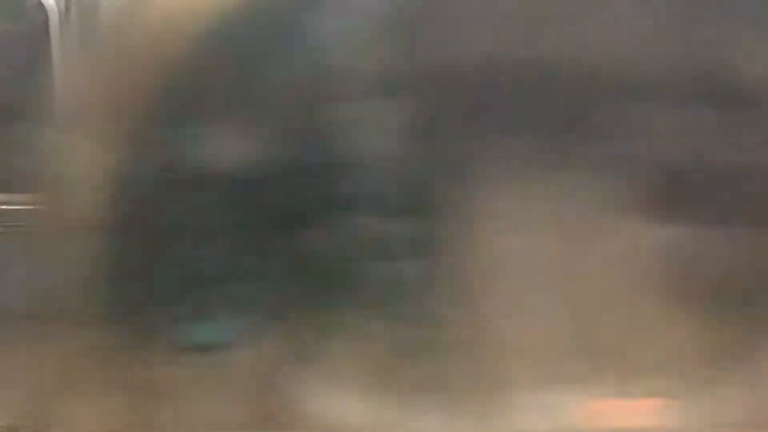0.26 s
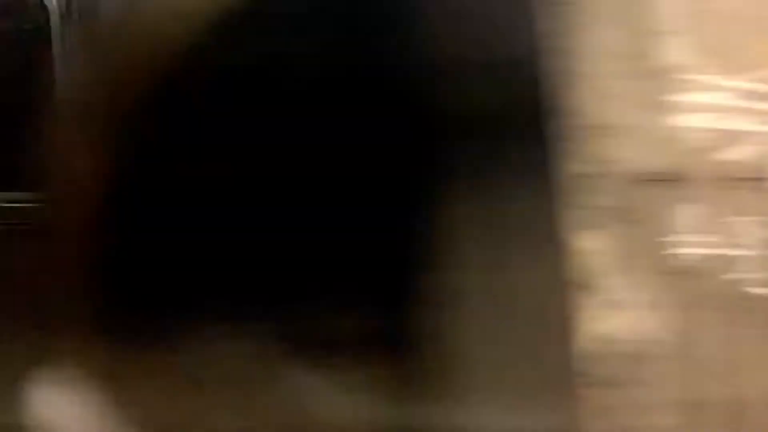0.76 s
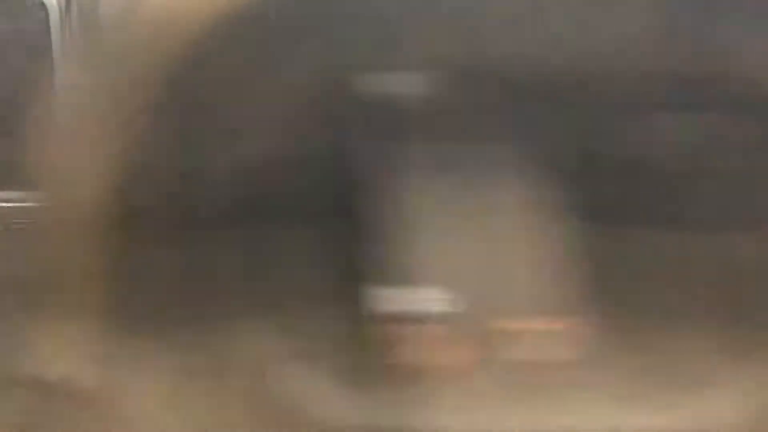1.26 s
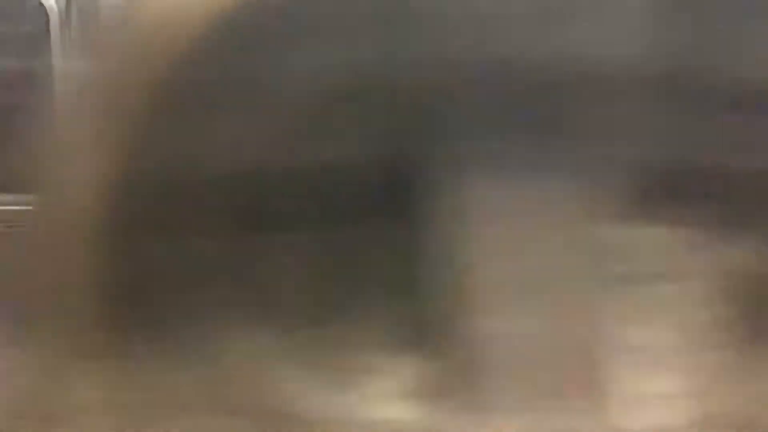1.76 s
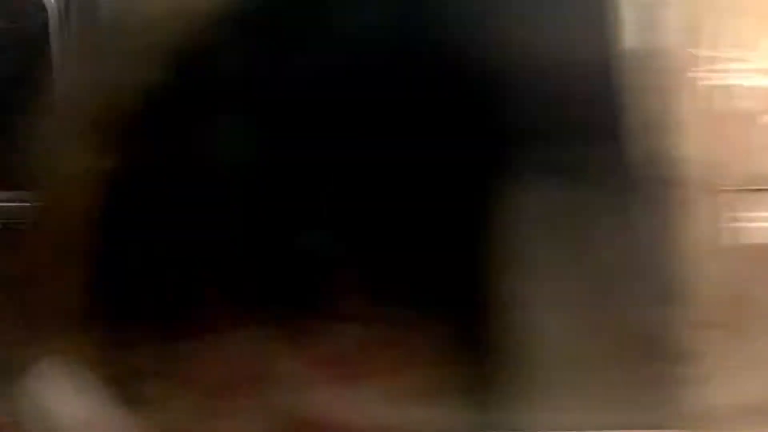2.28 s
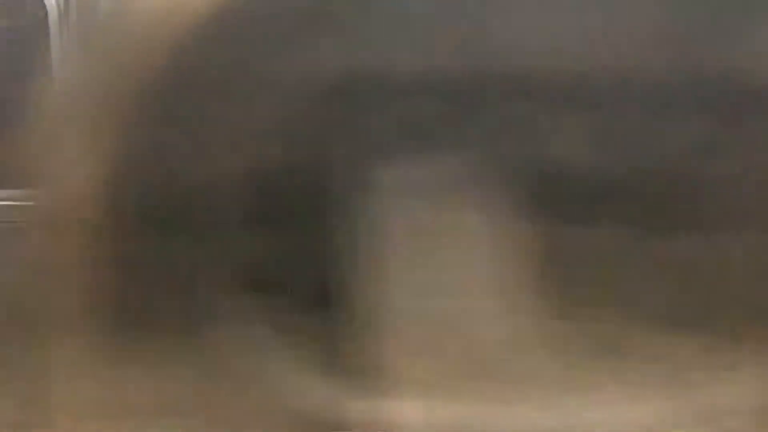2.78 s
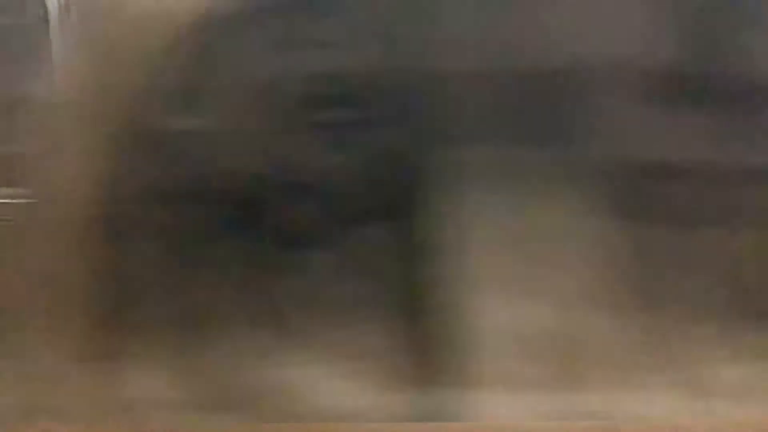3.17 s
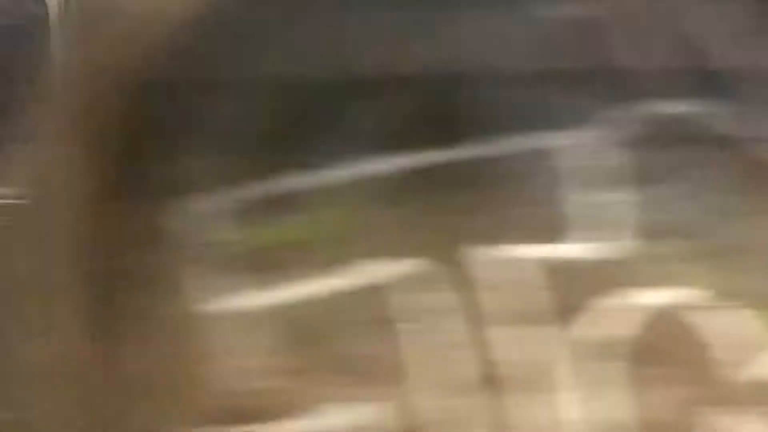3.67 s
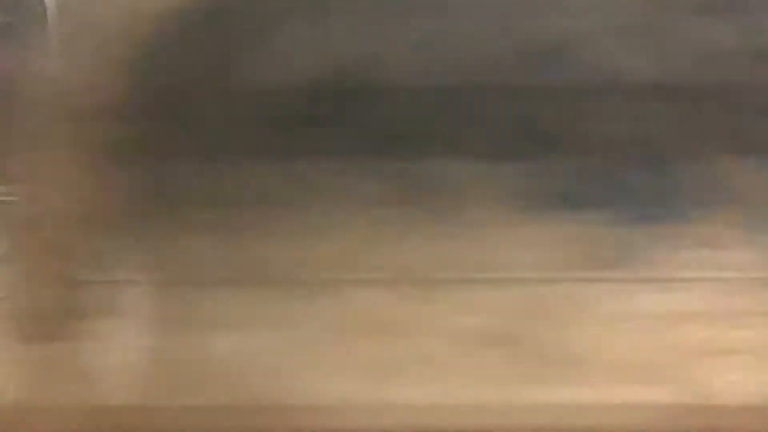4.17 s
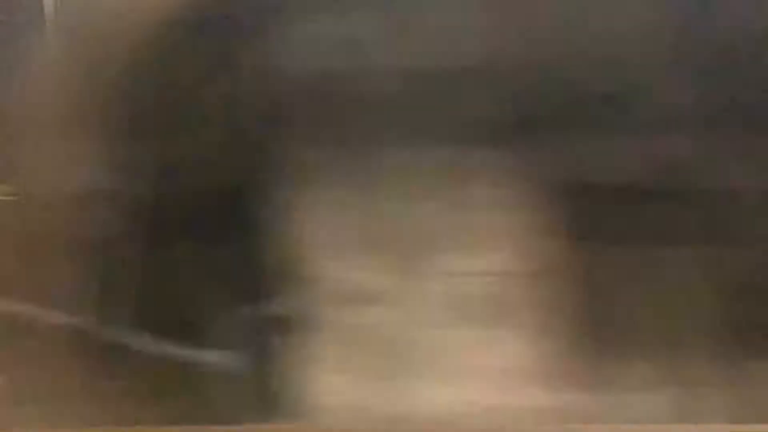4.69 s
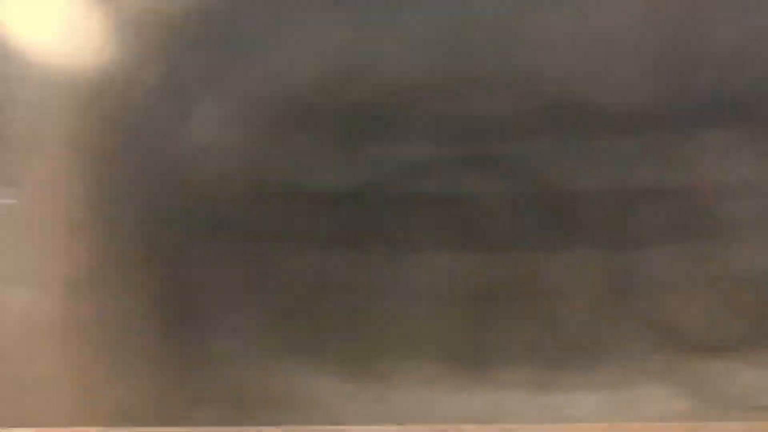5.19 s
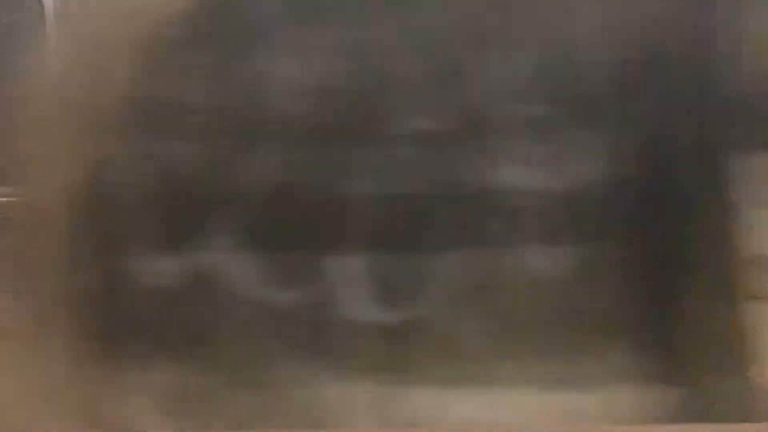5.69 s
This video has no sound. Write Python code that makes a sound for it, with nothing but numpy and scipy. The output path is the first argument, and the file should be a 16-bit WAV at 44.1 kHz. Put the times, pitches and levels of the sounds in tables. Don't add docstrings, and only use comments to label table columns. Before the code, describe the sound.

Inside a subway car running fast through a tunnel, steel wheels roar continuously on rough rails. The floor booms and a wall panel knocks in irregular quick thuds, densest at the start. Short high hisses of a metal shoe scraping the power rail come and go, with one tiny dry snap early and a crackling spark later. Two small microphones in the car give a wide, slightly overloaded sound.

```python
import sys
import numpy as np
from scipy import signal
from scipy.io import wavfile
from scipy.ndimage import uniform_filter1d

SR = 44100
rng = np.random.default_rng(int(sys.argv[2]) if len(sys.argv) > 2 else 0)


def transcribe(signal):
    frames = np.atleast_2d(signal).T
    limited = np.clip(frames, -1, 1)
    pcm = np.round(limited * 32767).astype(np.int16)
    wavfile.write(sys.argv[1], SR, pcm)


def amp(db):
    return 10 ** (np.asarray(db, float) / 20)


N = 262262

HOP = 256
FRAME_S = np.arange(N // HOP + 5) * HOP / SR
BIN_HZ = np.fft.rfftfreq(4 * HOP, 1 / SR)[:, None]


def evened(x):
    return x / np.sqrt(np.mean(abs(x) ** 2) + 1e-20)


def read(points, hz):
    f, value = np.transpose(points)
    return np.interp(np.log(hz + 1), np.log(f + 1), value)


def band_db(shape_db, lo_hz, hi_hz):
    inside = (BIN_HZ > lo_hz) & (BIN_HZ < hi_hz)
    return shape_db - 10 * np.log10(np.sum(amp(2 * shape_db[inside])) / len(BIN_HZ))


def swells(middle_s, length_s, rise=0.48):
    late = FRAME_S[:, None] - middle_s
    half_s = length_s * np.where(late < 0, rise, 1 - rise)
    return .5 ** (late / half_s) ** 2


# (f/Hz, likeness 0-1)
LIKENESS = [(30, .92), (90, .87), (180, .9), (260, .82), (420, .44), (540, .32), (700, .54), (1000, .28),
            (1550, .42), (2100, .2), (2700, .26), (3500, .12), (4000, .22), (5600, .1), (6900, .52),
            (8000, .72), (16000, .74)]
# (f/Hz, level/dB)
LEFT_LOUDER = [(60, -3.5), (110, 5.5), (200, -2.5), (380, 2.5), (500, 3.4), (700, 3), (950, 3),
               (1400, -0.4), (2380, 0.2), (4000, -0.1), (5400, -3), (8120, -.5), (15000, 2)]
# (f/Hz, phase/rad)
LEFT_LEADS = [(0, 0), (260, .2), (400, .7), (560, 1.7), (1150, 1.8), (1570, 3.4), (2200, 4.9), (2670, 3.8),
              (3060, 3.1), (4000, 6.3), (4500, 6.6), (5150, 9.4), (6300, 12.5), (8700, 9.4), (11100, 6.3),
              (13200, 3.1), (14900, .2), (15800, -1.6)]


def pair(field_db, patchy_db, ringy_db, flicker_db):
    a, b, c, d, patches, rings = rng.standard_normal((len(FRAME_S), len(BIN_HZ), 6)).T
    patches = evened(uniform_filter1d(uniform_filter1d(patches, size=10, axis=0), size=10, axis=1))
    rings = evened(uniform_filter1d(uniform_filter1d(rings, size=2, axis=0), size=24, axis=1))
    flicker = evened(uniform_filter1d(rng.standard_normal(len(FRAME_S)), size=3))
    same = read(LIKENESS, BIN_HZ)
    left = a + 1j * b
    delayed = left * np.exp(-1j * np.interp(BIN_HZ, *np.transpose(LEFT_LEADS)))
    right = same * delayed + np.sqrt(1 - same ** 2) * (c + 1j * d)
    lean = amp(read(LEFT_LOUDER, BIN_HZ) / 2)
    above_bass = 1 / (1 + (400 / (BIN_HZ + 1)) ** 2)
    field_db = field_db + above_bass * (patchy_db * patches + ringy_db * rings) + flicker_db * flicker
    z = np.array([left * lean, right / lean]) * amp(field_db)
    return signal.istft(z, nperseg=4 * HOP, noverlap=3 * HOP)[1][:, :N] / np.sqrt(3 * HOP)


# (f/Hz, level/dB per Hz)
ROAR_SPECTRUM = [(30, -40), (45, -12), (93, -8.5), (130, -12), (167, -9.5), (254, -9), (456, -11),
                 (640, -17.5), (1000, -20), (1600, -24), (2500, -26.5), (3100, -30), (4400, -38.5),
                 (5300, -49.5), (7400, -59)]
# (f/Hz, width/Hz, level over the roar/dB)
WHEEL_RINGS = [(242.6, 23, 4.5), (439, 29, 0.5), (747.4, 35, 8), (1116, 34, 3), (1400, 110, 2.5),
               (1878, 127, 3.5), (2366, 195, 2.5), (3286, 430, -7), (3800, 830, 0.5), (5850, 280, 4.5),
               (6800, 1200, 7.5)]


def wheel_spectrum():
    rings_db = sum(db / (1 + (2 * (BIN_HZ - hz) / width) ** 2) for hz, width, db in WHEEL_RINGS)
    blocked_db = 40 * np.log2(np.maximum(BIN_HZ / 8600, 1))
    return band_db(read(ROAR_SPECTRUM, BIN_HZ) + rings_db - blocked_db, 2103, 7000)


# (middle t/s, length/s, roar rise/dB, floor drum rise/dB, wall drum rise/dB)
ROUGH_STRETCHES = [(0.106, 0.11, 2, 2.5, 0.5), (.23, 0.13, 5.5, -0.1, 3.5), (0.413, 0.13, 2.5, -1.5, 5),
                   (0.576, 0.22, -1.2, 1, 3.5), (0.971, 0.11, -1, 2.5, 3.5), (1.081, 0.094, 0, 2, 0),
                   (1.185, 0.15, 4, 0.5, 2), (1.51, 0.25, 2.5, 3, 4.5), (2.032, .12, -0.5, .5, 0.5),
                   (2.151, 0.11, -0.5, -3.5, 3), (2.539, 0.16, 1.5, 2.5, 4), (2.704, 0.16, 1, 3.5, 3),
                   (2.909, 0.12, 3, 3.5, 4), (3.095, 0.19, 2.5, 3, 4.5), (3.431, 0.24, 1.5, 1, 1),
                   (3.783, 0.4, 2, 0, 0.9), (3.97, 0.13, 0.5, 2, -0.5), (4.098, 0.11, 4.5, 4.5, 5),
                   (4.25, 0.11, 1, 2.5, 1), (4.531, 0.086, 0.3, -1, 3), (4.787, 0.3, -0.1, 1, 1.8),
                   (5.121, 0.15, 1, 1, 1.7), (5.309, 0.12, 2, 2.5, 0), (5.556, 0.059, 1.5, 4, 2),
                   (5.805, 0.23, 1.5, 2.5, 2.7)]


def rough_rail():
    s, length, *rise_db = np.transpose(ROUGH_STRETCHES)
    roar_db, floor_db, wall_db = rise_db @ swells(s, length).T
    floor_db = floor_db + 0.73 - 0.65 * FRAME_S
    wall_db = wall_db - 0.06 - 1.03 * FRAME_S
    roar_db = roar_db - 1.0 * FRAME_S
    low = 1 / (1 + (BIN_HZ / 520) ** 4)
    high = 1 / (1 + (1600 / (BIN_HZ + 1)) ** 4)
    return low * floor_db + (1 - low - high) * wall_db + high * roar_db


# (middle t/s, length/s, f/Hz, level over the roar/dB)
RING_FLARES = [(0.085, 0.17, 284, 7), (0.267, 0.11, 3480, -0.5), (0.325, 0.11, 4890, 3),
               (0.536, 0.091, 920, 3.0), (0.945, 0.073, 265, 4.5), (1.181, 0.12, 540, 5.5),
               (1.193, 0.17, 2390, 3.5), (1.26, 0.11, 3080, 2.5), (1.32, 0.082, 2390, 4),
               (1.429, 0.1, 1330, 3.5), (1.503, 0.11, 2670, 2.5), (1.544, 0.048, 973, 1),
               (1.698, 0.069, 590, 4.5), (2.101, 0.098, 3150, 2), (2.154, 0.1, 7660, 4),
               (2.499, 0.108, 1650, 2.5), (2.563, 0.12, 1297, 1.5), (2.638, 0.13, 3330, 2.0),
               (2.854, 0.061, 1912, -3), (2.953, 0.083, 456, 4), (3.078, 0.14, 181, 6.5),
               (3.146, 0.085, 3340, 0), (3.454, 0.093, 290, 1), (3.553, 0.089, 3140, 2.5),
               (3.593, 0.085, 1460, -1), (3.64, 0.11, 468, 2.5), (3.717, 0.15, 524, 2),
               (4.093, 0.053, 1700, 2), (4.106, 0.2, 4580, 2), (4.113, 0.161, 321, 6.5),
               (4.186, 0.23, 915, 2.5), (4.22, 0.072, 2500, 1.5), (4.343, 0.094, 605, 3.0),
               (4.406, 0.083, 3480, 2.5), (4.464, 0.084, 5470, 7), (4.529, 0.057, 414, 8),
               (4.735, 0.084, 940, 1), (4.76, 0.101, 6440, 6), (4.886, 0.07, 1713, 6),
               (5.12, 0.22, 3950, 2.5), (5.133, 0.12, 830, 2.5), (5.191, 0.109, 5150, 2.0),
               (5.318, 0.079, 1800, 4.5), (5.574, 0.121, 6040, 1.5), (5.608, 0.093, 2975, 1),
               (5.857, 0.052, 345.5, 5.5), (5.884, 0.07, 1063, 1), (5.95, 0.074, 4195, 4)]


def ring_flares():
    width_octaves, gain = 0.26, 1.24
    s, length, hz, db = np.transpose(RING_FLARES)
    near = .5 ** (2 * np.log2((BIN_HZ + 1) / hz) / width_octaves) ** 2
    return gain * near @ (swells(s, length) * db).T


def rolling():
    level_db = -35 + 6
    field_db = wheel_spectrum() + level_db + rough_rail() + ring_flares()
    return pair(field_db, patchy_db=0.35, ringy_db=2.5, flicker_db=0.49)


def mode(hz, width, steadiness):
    r = np.exp(-np.pi * width / SR)
    swing = rng.standard_normal((N, 2)) @ [1, 1j]
    for _ in range(2):
        swing = signal.lfilter([1 - r], [1, -r], swing)
    swing = swing / (abs(swing) + 1e-9) ** steadiness
    phase = 2 * np.pi * np.cumsum(hz) / SR
    return evened((swing * np.exp(1j * phase)).real)


def shaken(rows, rest_db, rest_hz):
    s, length, db, hz = np.transpose(rows)
    power = swells(s, 1.14 * length) * amp(2 * db)
    rest = amp(2 * rest_db)
    total = power.sum(axis=1) + rest
    pitch = (power @ hz + rest * rest_hz) / total
    t = np.arange(N) / SR
    return np.interp(t, FRAME_S, np.sqrt(total)), np.interp(t, FRAME_S, pitch)


# (middle t/s, length/s, level/dB, f/Hz)
PANEL_KNOCKS = [(0.009, 0.035, -16, 135), (0.045, 0.036, -14.5, 131.3), (0.122, 0.036, -15.5, 134.6),
                (0.186, 0.035, -16, 143.4), (0.252, 0.038, -19, 138), (0.361, 0.035, -23.5, 140.7),
                (0.392, 0.034, -20.0, 146.9), (0.474, 0.035, -21.0, 138.8), (0.506, 0.035, -21.0, 150),
                (0.558, 0.036, -19.0, 140.0), (0.587, 0.037, -21, 147), (0.658, 0.039, -17.0, 132.7),
                (0.726, 0.036, -21.5, 141.3), (0.88, 0.038, -22.5, 139), (0.975, 0.043, -19, 138.2),
                (1.063, 0.037, -19.5, 141.4), (1.181, 0.04, -19.5, 138.8), (1.24, 0.035, -20.5, 138.8),
                (1.315, 0.035, -24, 140.4), (1.345, 0.033, -22.5, 149.8), (1.385, 0.035, -23, 140.6),
                (1.415, 0.036, -20.5, 132.7), (1.599, 0.039, -23.5, 136.5), (1.649, 0.034, -19.5, 141),
                (1.746, 0.035, -19, 144.4), (1.785, 0.038, -23.5, 138), (1.816, 0.038, -23.5, 138.7),
                (1.878, 0.037, -22.5, 151), (2.107, 0.036, -18.5, 142.1), (2.281, 0.037, -21.5, 148.6),
                (2.476, 0.035, -20.5, 139.8), (2.549, 0.034, -23, 144.4), (2.603, 0.033, -20.5, 136),
                (2.687, 0.036, -21, 143), (2.873, 0.036, -18.5, 143.1), (3.057, 0.033, -19, 142.6),
                (3.093, 0.04, -14.5, 141.2), (3.331, 0.031, -23.5, 137.0), (4.143, 0.036, -18, 135.8),
                (4.2, 0.037, -21, 133.1), (4.247, 0.035, -19.5, 143.7), (4.381, 0.037, -21.5, 148.3),
                (4.546, 0.039, -19, 131.9), (4.603, 0.038, -22.5, 132.8), (4.649, 0.039, -21.5, 143.6),
                (4.88, 0.035, -25, 139), (4.934, 0.034, -21.5, 133), (5.041, 0.035, -23, 138.3),
                (5.404, 0.035, -23, 141), (5.44, 0.035, -23.0, 133.8)]


def wall_panel():
    gain, hz = shaken(PANEL_KNOCKS, rest_db=-31.5, rest_hz=138.8)
    return 0.7 * gain * mode(hz, width=26., steadiness=.85)


# (middle t/s, length/s, level/dB, f/Hz)
FLOOR_BOOMS = [(0.018, 0.021, -11, 89.7), (0.086, 0.027, -17, 89.6), (0.195, 0.072, -11.5, 94.03),
               (0.317, 0.082, -13.5, 93.73), (0.429, 0.028, -14, 88.47), (0.54, 0.044, -19.5, 94),
               (0.678, 0.035, -21.5, 90.75), (0.757, 0.054, -19.0, 86.55), (0.893, 0.034, -21.5, 84.64),
               (0.952, 0.026, -26.5, 86.86), (1.104, 0.033, -17, 90.24), (1.184, 0.038, -11, 83),
               (1.338, 0.066, -15.5, 91.5), (1.41, 0.028, -18.5, 91.9), (1.469, 0.027, -17.5, 87.3),
               (1.506, 0.032, -15, 94.7), (1.599, 0.082, -17, 90.96), (1.741, 0.028, -15, 83.26),
               (1.812, 0.031, -23.5, 86.6), (1.85, 0.031, -20, 90.6), (1.891, 0.024, -20, 85.4),
               (2.154, 0.047, -20, 94.1), (2.238, 0.022, -17.5, 90.2), (2.324, 0.031, -20.0, 87.4),
               (2.381, 0.037, -19.5, 95.1), (2.562, 0.036, -20, 96), (2.599, 0.028, -27.5, 89.6),
               (2.655, 0.024, -32, 91.6), (2.769, 0.04, -23.5, 96.94), (2.878, 0.031, -20.5, 96.4),
               (2.914, 0.059, -21.0, 83.14), (3.054, 0.032, -11.5, 89.7), (3.136, 0.041, -13.0, 86.74),
               (3.247, 0.039, -20.5, 89), (3.333, 0.024, -17, 94.8), (3.426, 0.031, -22, 93.2),
               (3.531, 0.039, -25.5, 94.7), (3.678, 0.034, -24, 93.7), (3.891, 0.035, -21.5, 94.6),
               (3.955, 0.024, -17.5, 90.5), (4.109, 0.036, -14.5, 93.3), (4.168, 0.059, -16, 90),
               (4.315, 0.05, -17.5, 92.7), (4.449, 0.053, -22.5, 86.3), (4.599, 0.032, -22.5, 93.5),
               (4.68, 0.025, -20.0, 100.7), (5.095, 0.027, -22.5, 83.5), (5.333, 0.035, -18, 88.4),
               (5.592, 0.035, -21.0, 94.6), (5.857, 0.039, -21.5, 84.4)]


def floor_boom():
    gain, hz = shaken(FLOOR_BOOMS, rest_db=-32.5, rest_hz=89.8)
    return gain * mode(hz, width=14., steadiness=.9)


# (middle t/s, length/s, level/dB, f/Hz)
CAR_SWAYS = [(0.098, 0.047, -16.5, 45.9), (0.161, 0.04, -19.5, 52.9), (0.249, 0.043, -19.5, 53),
             (0.388, 0.03, -20, 47), (0.447, 0.049, -18, 44.5), (0.587, 0.031, -26.5, 55.6),
             (0.68, 0.059, -22, 55.6), (0.803, 0.032, -24.5, 55), (0.873, 0.027, -24, 58.7),
             (0.952, 0.032, -17, 51.2), (1.025, 0.032, -25, 54), (1.107, 0.031, -20, 53.8),
             (1.22, 0.12, -17.5, 53.7), (1.499, 0.058, -17.5, 54), (1.576, 0.046, -15, 51.8),
             (1.701, 0.04, -18, 60.5), (1.825, 0.086, -21, 52.6), (2.018, 0.062, -20, 54.2),
             (2.141, 0.035, -24, 52.5), (2.295, 0.031, -18.5, 54.8), (2.372, 0.042, -22.5, 58),
             (2.454, 0.038, -19.5, 58.2), (2.517, 0.046, -22, 55.1), (2.671, 0.051, -18, 51.4),
             (2.744, 0.043, -20.5, 57.6), (2.868, 0.035, -18.5, 53.2), (2.939, 0.037, -21, 55.3),
             (2.993, 0.062, -19.5, 53.1), (3.143, 0.041, -18, 50.7), (3.231, 0.045, -18, 51.9),
             (3.512, 0.065, -23, 51.6), (3.603, 0.047, -22.5, 59.4), (3.735, 0.074, -22.5, 49.6),
             (3.88, 0.033, -16, 54.2), (3.943, 0.037, -25, 54.1), (4.007, 0.075, -22.5, 59.5),
             (4.231, 0.09, -21.0, 60), (4.44, 0.099, -24, 51.6), (4.599, 0.039, -26.5, 51.7),
             (4.714, 0.034, -25.0, 52.2), (4.769, 0.041, -21.5, 51.2), (4.957, 0.15, -22.5, 52.6),
             (5.118, 0.053, -21.5, 62.8), (5.265, 0.039, -22.5, 62), (5.594, 0.033, -24, 55.6),
             (5.717, 0.035, -25.5, 51.7), (5.8, 0.049, -18.5, 54.6), (5.925, 0.035, -18, 52.0)]


def car_sway():
    gain, hz = shaken(CAR_SWAYS, rest_db=-32, rest_hz=54.6)
    return gain * mode(hz, width=14., steadiness=.9)


def body():
    late = 15
    both = np.pad(wall_panel() + floor_boom() + car_sway(), (late, 0), "edge")
    return np.array([both[late:], both[:N]]) * amp(np.array([[-.5], [.5]]))


# (f/Hz, level/dB per Hz)
HISS_SPECTRUM = [(5000, -25), (6300, -6), (7000, -3), (8400, -2), (9300, 0), (10300, -2), (11500, -5),
                 (12500, -9), (13500, -30)]
# (f/Hz, level/dB per Hz)
THIN_TOP_SPECTRUM = [(11000, -30), (12200, -1), (13800, -1), (14900, -9), (15400, -18), (16200, -30)]
# (peak t/s, length/s, hiss level/dB, ring over hiss/dB, thin top over hiss/dB)
SHOE_BITES = [(0.065, 0.13, -61, 5.5, -7), (0.196, 0.094, -55, 2, -7), (.41, 0.15, -57.5, -1, -5),
              (0.634, 0.095, -65, 4, -2), (0.773, 0.1, -63, 1.5, -6), (1.048, 0.12, -63, -2, -4),
              (1.164, 0.12, -59.5, 8, -2), (1.486, 0.14, -64, 2, -6), (1.623, .16, -66, -2.2, -6),
              (1.884, 0.076, -63.5, -1.5, -11), (2.116, 0.09, -54.5, 1, -15), (2.434, 0.06, -56, 5, -24),
              (2.849, 0.22, -61.5, 0, -9), (3.086, 0.18, -62.5, .3, -6), (3.48, 0.063, -67, 1.5, -9),
              (3.645, 0.098, -70, .3, -11), (4.069, 0.19, -59, 4, -12), (4.145, 0.2, -68, 24, -8),
              (4.308, 0.13, -62, 2.2, -8), (4.449, 0.095, -57.5, -3, -4), (4.751, 0.087, -60, 2, -12),
              (4.824, 0.063, -58.5, 1.5, -9.5), (5.063, 0.19, -74, 6, -9), (5.93, 0.055, -68, 1, -8)]


def shoe():
    slide_db, slide_ring_db, slide_top_db = -71.5, -67, -81
    s, length, bite_db, ring_db, top_db = np.transpose(SHOE_BITES)
    bites = swells(s, length, rise=0.33) * amp(2 * bite_db)
    hiss = amp(2 * band_db(read(HISS_SPECTRUM, BIN_HZ), 10520, 13000))
    thin = amp(2 * band_db(read(THIN_TOP_SPECTRUM, BIN_HZ), 12300, 14000))
    ring_shape_db = -20 * np.log10(1 + (2 * (BIN_HZ - 8570) / 320) ** 2)
    ring = amp(2 * band_db(ring_shape_db, 8150, 8700))
    power = hiss * amp(2 * 1.0) * (bites.sum(axis=1) + amp(2 * slide_db))
    power += thin * amp(2 * 4.0) * (bites @ amp(2 * top_db) + amp(2 * slide_top_db))
    power += ring * amp(2 * -2.5) * (bites @ amp(2 * ring_db) + amp(2 * slide_ring_db))
    power += spark_power()
    return pair(10 * np.log10(power), patchy_db=1.5, ringy_db=3., flicker_db=0.6)


def tick():
    t = np.arange(N) / SR - .5275
    level_db = -41 - 60 * abs(t) / .012
    snap = rng.standard_normal(N) * (t >= 0) * amp(level_db)
    bright = signal.butter(2, 6000, "high", fs=SR, output="sos")
    return signal.sosfilt(bright, snap) * np.array([[1], [.7]])


# (t/s, peak level/dB, time to fall 60 dB/s)
SHOE_SPARKS = [
    (3.829, -41.5, .12),
    (5.75, -55, .07),
]


def spark_power():
    sparks = sum(amp(2 * (db - 60 * abs(FRAME_S - s) / t60)) * (FRAME_S >= s) for s, db, t60 in SHOE_SPARKS)
    shape_db = -30. * (BIN_HZ < 7000) - BIN_HZ / 1200
    return amp(2 * band_db(shape_db, 9000, 16000)) * sparks


def scene():
    return rolling() + body() + shoe() + tick()


def low_pass(x):
    return signal.sosfilt(signal.butter(12, 17060, fs=SR, output="sos"), x)


def record(dry):
    ceiling = 2.2
    cut = signal.sosfilt(signal.butter(4, 38., "high", fs=SR, output="sos"), dry)
    rounded = ceiling * np.tanh(cut / ceiling)
    started = rounded * np.minimum(np.arange(N) / 60, 1)
    top_edge = signal.firwin(511, 15750, window=("kaiser", 9), fs=SR)
    mix = signal.oaconvolve(started, top_edge[None], "same")
    return low_pass(mix)


dry = scene()
out = record(dry)
transcribe(out)
```